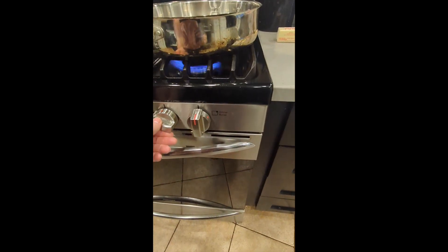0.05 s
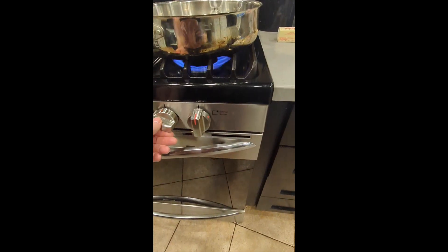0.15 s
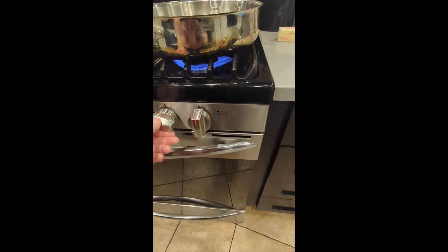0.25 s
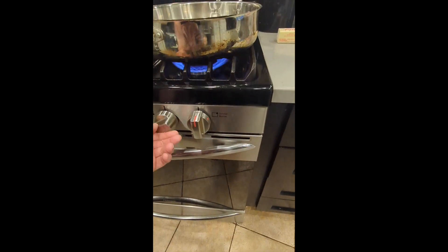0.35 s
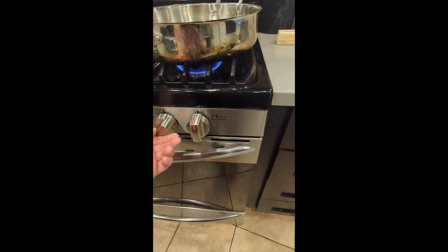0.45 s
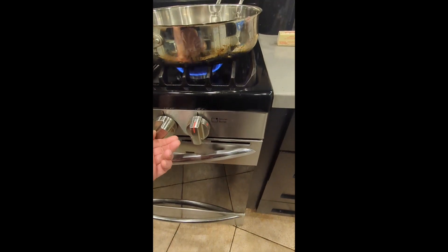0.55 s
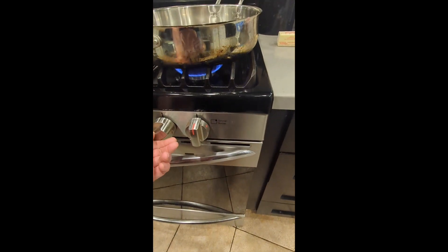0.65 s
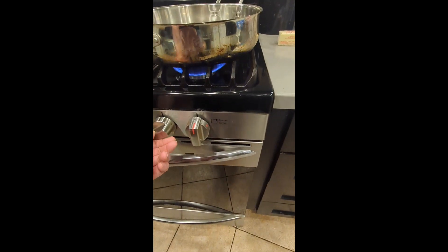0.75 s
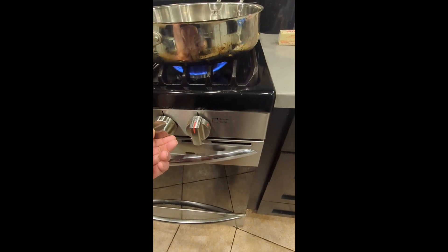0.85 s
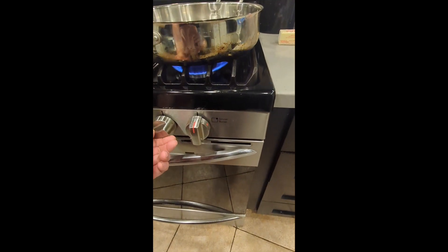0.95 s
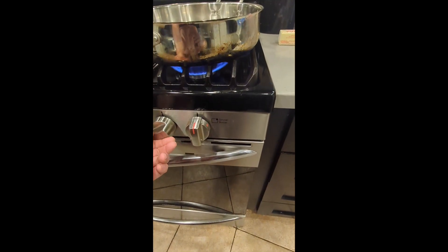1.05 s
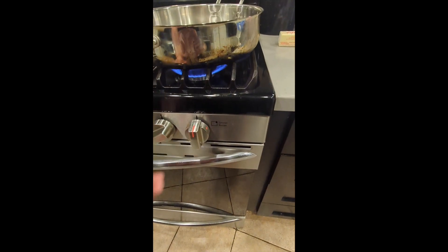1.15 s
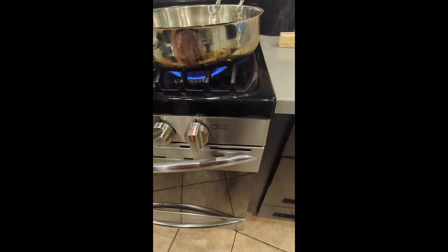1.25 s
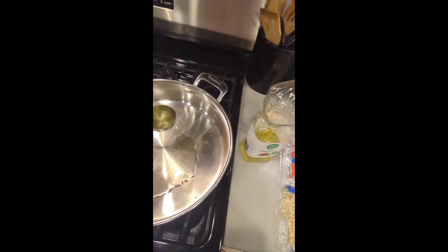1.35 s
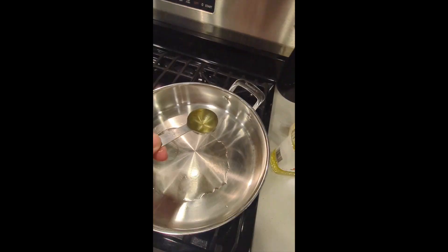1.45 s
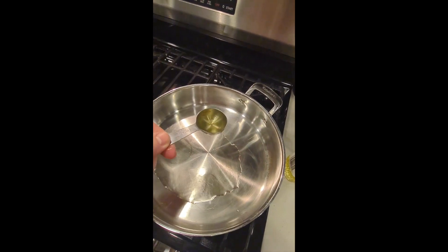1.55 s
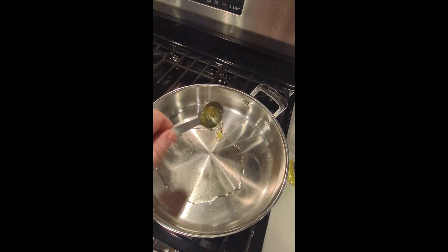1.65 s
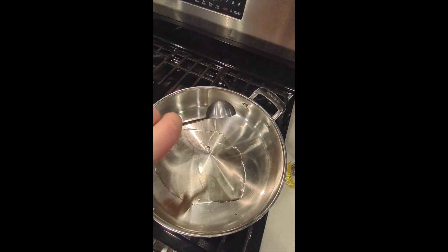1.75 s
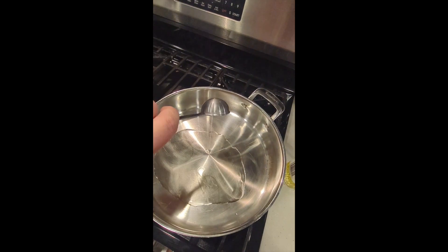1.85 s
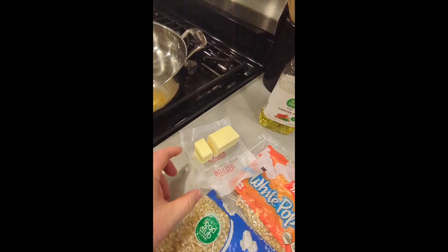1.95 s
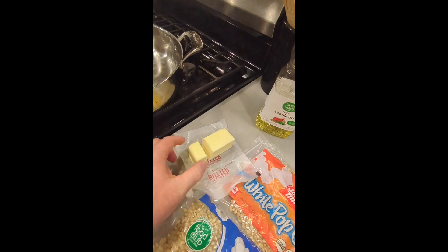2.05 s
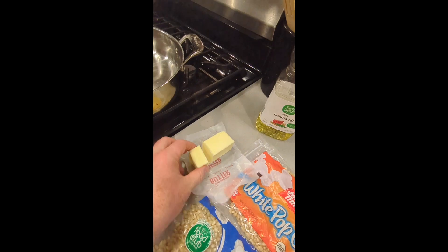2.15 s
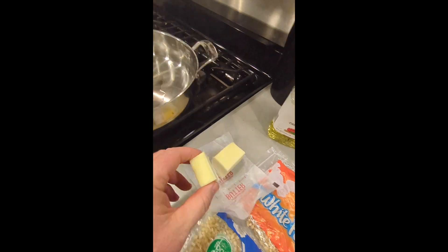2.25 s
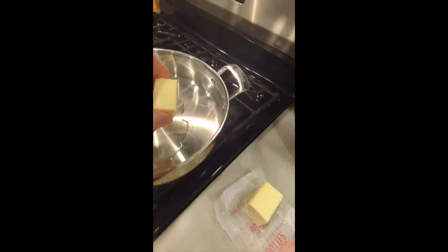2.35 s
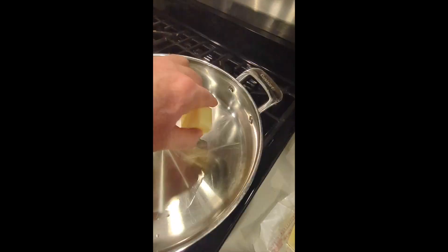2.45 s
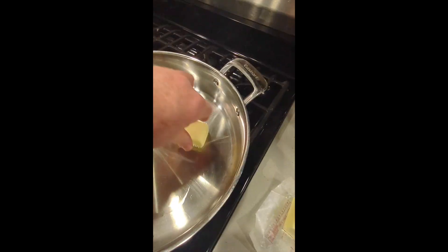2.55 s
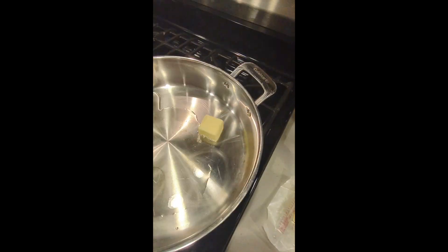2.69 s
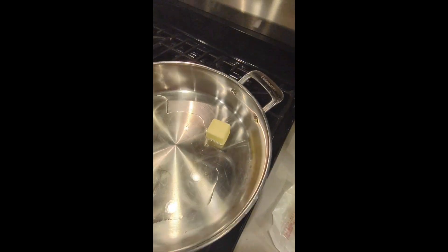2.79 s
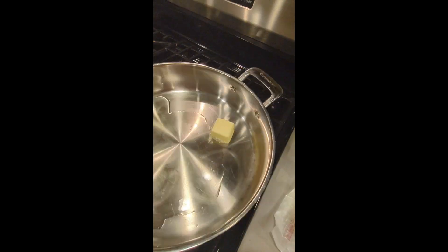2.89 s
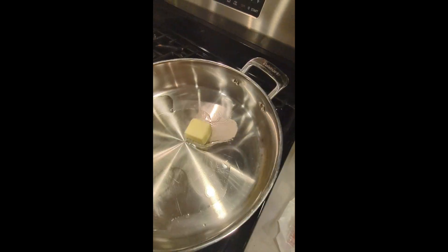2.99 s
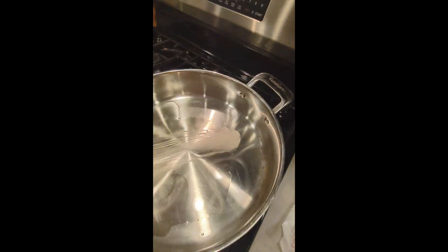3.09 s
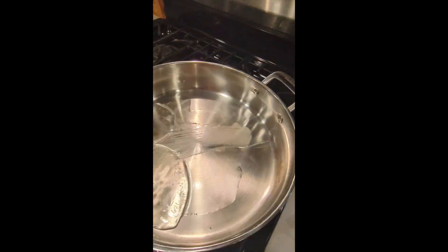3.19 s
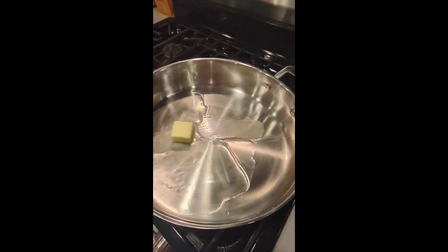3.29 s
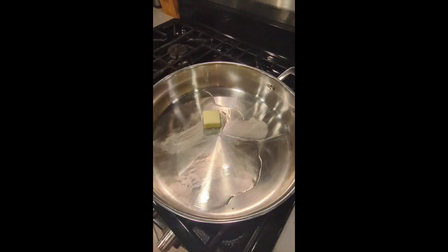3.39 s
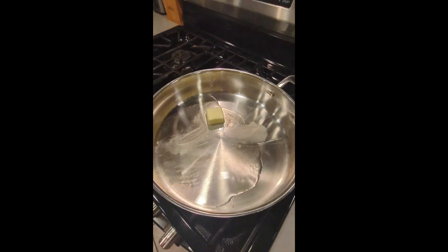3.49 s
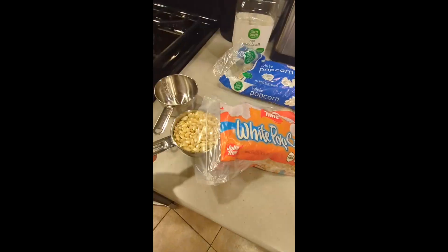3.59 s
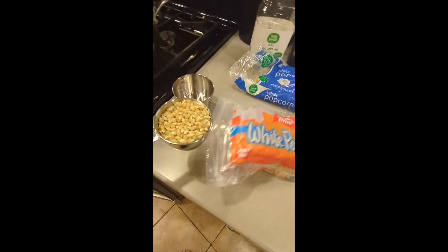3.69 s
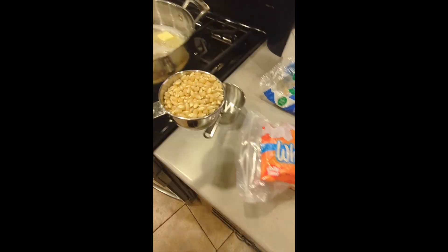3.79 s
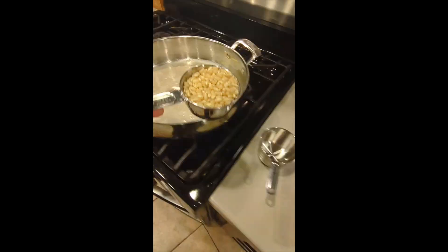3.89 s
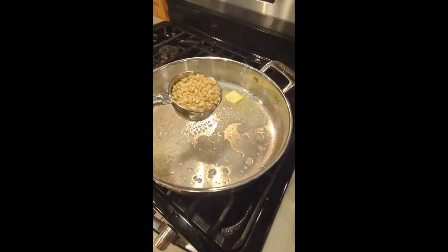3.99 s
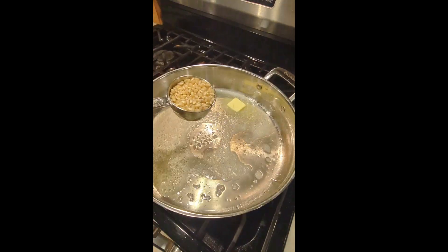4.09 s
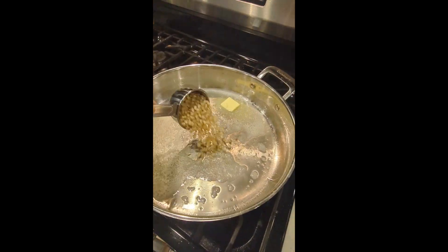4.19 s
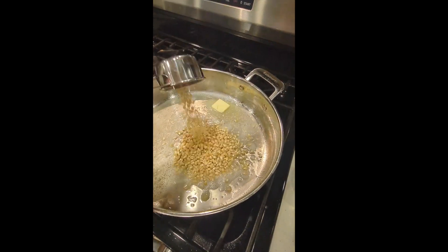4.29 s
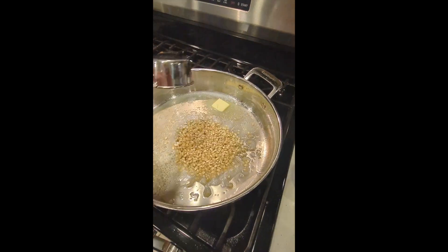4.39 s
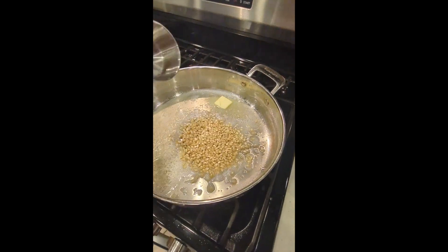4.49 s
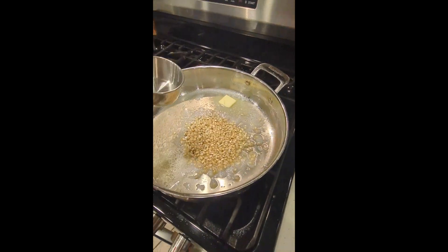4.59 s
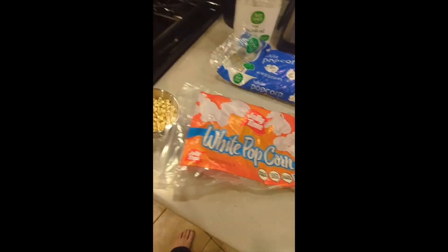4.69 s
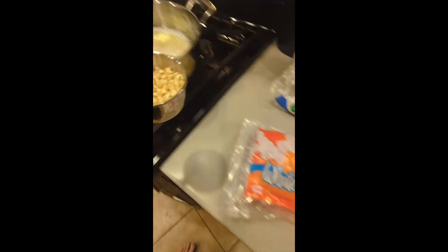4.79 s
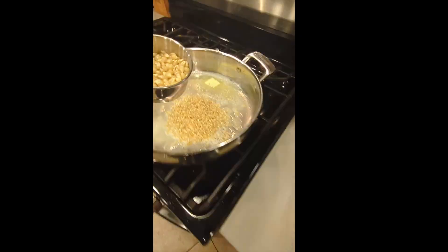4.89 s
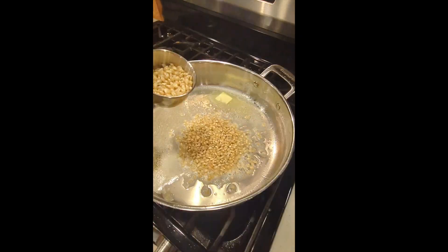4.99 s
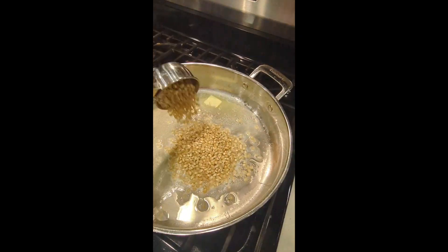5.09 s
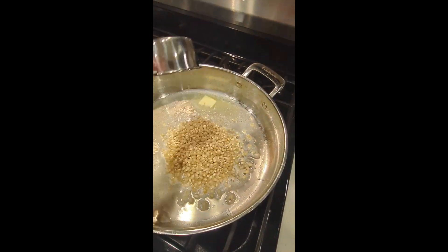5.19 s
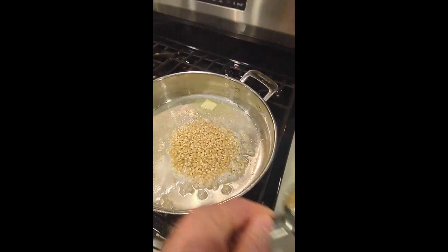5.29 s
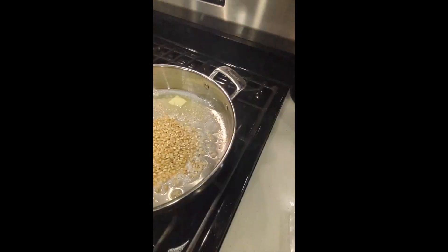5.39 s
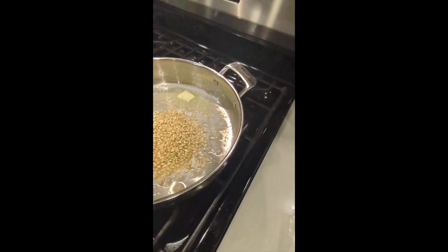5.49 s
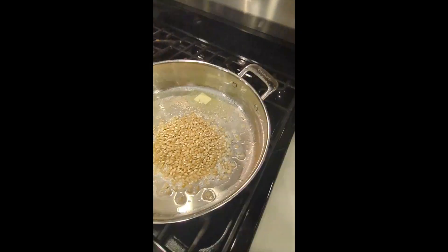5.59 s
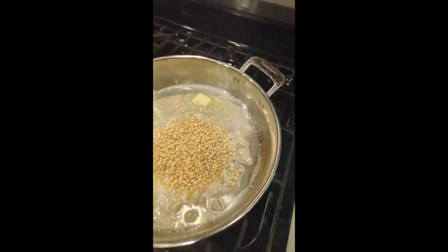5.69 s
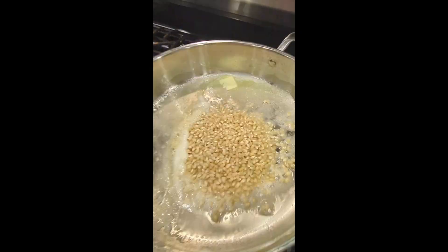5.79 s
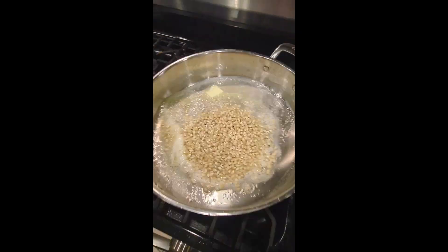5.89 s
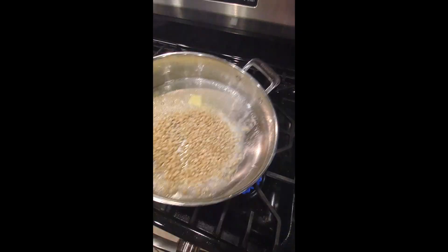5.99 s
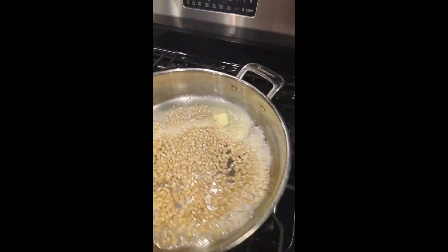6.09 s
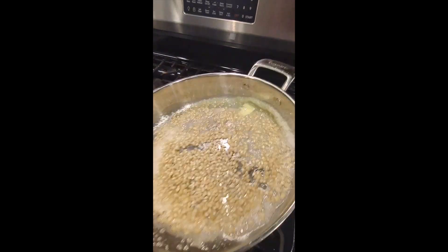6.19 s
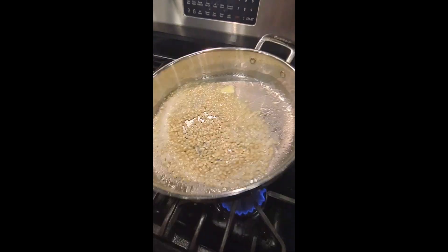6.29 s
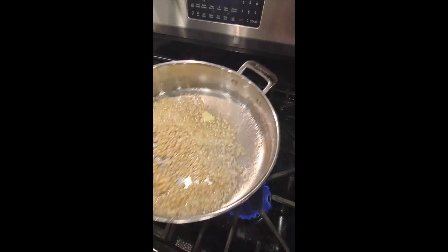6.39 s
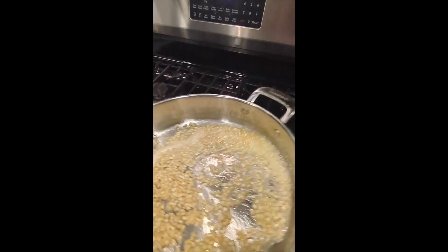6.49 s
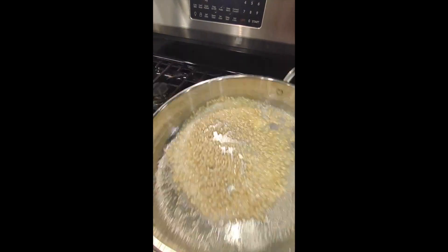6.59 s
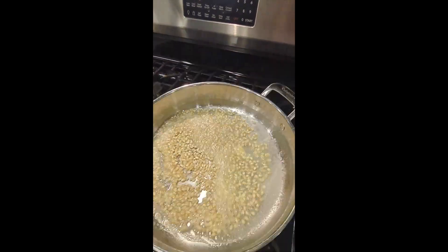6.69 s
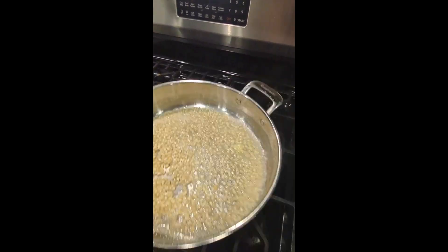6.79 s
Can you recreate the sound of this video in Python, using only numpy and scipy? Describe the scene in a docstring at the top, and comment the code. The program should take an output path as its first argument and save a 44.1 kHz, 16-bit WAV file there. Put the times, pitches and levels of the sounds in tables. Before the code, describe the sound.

Three sharp stove sparks, a soft gas whoosh, paper snaps, metallic pan knocks, two pours of hard kernels, then growing sizzle with swishing shakes.

```python
"""A steel pan is knocked, scraped and shaken on a gas stove while popcorn is started in hot fat.
Blows ring the pan's modes, kernels pour in as a hail of clicks, and the fat sizzles in tiny ringing bursts.
Igniter sparks are noisy cracks and the flame is coloured noise; a utensil, a cup and wrappers tap, clink and snap.
Appliance hum, a whine and air noise lie behind. Five short parts, each heard from a new place,
are joined by brief fades."""
import sys
import numpy as np
from scipy import signal
from scipy.fft import rfft, irfft, next_fast_len
from scipy.io import wavfile

SR = 44100
rng = np.random.default_rng(int(sys.argv[2]) if len(sys.argv) > 2 else 0)


def inscribe(sig):
    """Save sig as 16-bit PCM at rate SR to the path in sys.argv[1].

    A 1-D sig is mono; a 2-D sig holds one channel per row.
    Samples are clipped to [-1, 1] before scaling.
    """
    pcm = np.round(np.clip(np.atleast_2d(sig).T, -1, 1) * 32767)
    wavfile.write(sys.argv[1], SR, pcm.astype(np.int16))


N = 302085
T = np.arange(N) / SR

# pan modes: (pitch [Hz], 60 dB ring time when loaded [s], level when empty [dB], level when loaded [dB])
PAN_MODES = [(387, 0.12, -12, -16), (730, 0.088, -10, -16.5), (1270, 0.36, -35, -15.5),
             (1354, 0.21, -26, -15), (1567, 0.31, -18.5, -21), (1778, 0.6, -26.5, -13),
             (2341, 0.34, -15.5, -6.5), (2680, 0.5, -21, -31), (3700, 0.57, -31, -31),
             (3770, 0.38, -17, -45), (3980, 0.26, -12, -44), (5450, 0.19, -11, -37), (6745, 0.065, -18, -2)]
# kernels pouring: (first landing [s], fullest flow [s], level [dB], half length [s], pitch factor [ratio])
POUR_EVENTS = [(4.212, 4.265, -32, 0.069, 1), (5.084, 5.169, -36.5, 0.031, 1.06)]
# parts, each with the microphone in a new place: (start [s], kitchen level [dB], extra hum [dB])
PARTS = [(0, -63, -1), (1.358, -58, -4), (1.993, -56, -4), (3.559, -55.5, -3), (4.659, -55.5, -3)]
# how alike left and right are: (frequency [Hz], correlation [-1 to 1])
STEREO_LIKENESS = [(100, 0.98), (500, 0.85), (1200, 0.61), (2500, 0.46), (6000, 0.015)]
SOFT_CONTACT_HZ = 3230   # a dull blow barely reaches the modes above this


def pan():
    """The pan scrapes and lands on the iron grate; once the kernels are in, they damp its wall and upper modes."""
    # iron grate rocking under the pan: (time [s], level [dB])
    rock_events = [(6.015, -42), (6.02, -42)]
    # grate modes: (pitch [Hz], 60 dB ring time [s], level [dB])
    iron_modes = [(838, 0.05, 9.5), (1281, 0.21, -0.5), (2300, 0.47, -3), (2420, 0.31, 1)]
    # colour of the rocking and scraping: (frequency [Hz], relative level [dB per Hz])
    grate_colour = [(120, -16), (300, 3), (750, 9.5), (2400, -1), (6500, 4), (12000, -8)]
    # pan landing and settling: (time [s], level [dB], tilt [dB per octave], ring [dB])
    knock_events = [(3.157, -30.5, -2, -2), (3.1632, -16.5, 4.5, 2), (3.171, -24, 3.5, 2),
                    (3.177, -15, 0.5, -3), (3.185, -24.5, -0.5, 3.5), (3.346, -41.5, -5.5, 0),
                    (3.37, -38, -6, -2), (5.752, -23.5, 4, 0.5), (5.761, -33, -2, 8)]
    # colour of the knocks: (frequency [Hz], relative level [dB per Hz])
    knock_colour = [(130, -1), (300, 0.5), (1000, 1.5), (2400, 1.5), (4600, -2), (7500, 4), (9000, -5),
                    (16000, -15.5)]

    rocking = strikes(rock_events, grate_colour, iron_modes, crack_t60=0.066, tail_db=-7.5, tail_t60=0.45)
    out = scrape(grate_colour) + rocking
    first_pour_s = POUR_EVENTS[0][0]
    for loaded in (False, True):
        knocks = [row for row in knock_events if (row[0] > first_pour_s) == loaded]
        if loaded:
            modes = [(hz, t60, full_db) for hz, t60, empty_db, full_db in PAN_MODES]
        else:
            # the empty pan lands flat and hard, so the grate shortens its ring
            modes = [(hz, .65 * t60, empty_db) for hz, t60, empty_db, full_db in PAN_MODES]
            modes = modes + wall_modes()
        out = out + strikes(knocks, knock_colour, modes,
                            crack_t60=0.032, tail_db=-10.0, tail_t60=0.14, partials=400)
    return out


def wall_modes(count=44):
    """The pan's wall has a crowd of weak, closely spaced modes."""
    low_hz, high_hz, t60_s, level_db = 416.4, 4410, 0.24, -28.5
    pitches = np.linspace(low_hz, high_hz, count) + low_hz * rng.uniform(0, 0.45, count)
    return [(hz, t60_s, level_db) for hz in pitches]


def scrape(spectrum, width_hz=70, ring_db=22):
    """Steel judders over iron in tiny slips, which set the pan's lower modes singing."""
    # pan sliding, gathering speed until it catches: (catch [s], level [dB], run-up [s])
    slide_events = [(2.93, -48, 0.073), (5.702, -36, 0.019), (5.747, -37.5, 0.021), (6.78, -51, 0.19)]
    stop_s = 0.021
    speed = sum(from_db(db) * envelope(s, run_up, 0, stop_s) for s, db, run_up in slide_events)
    slips = grains(per_s=1800, spread_db=0.0)
    low_modes = [(hz, width_hz, full_db + ring_db)
                 for hz, t60, empty_db, full_db in PAN_MODES if hz < SOFT_CONTACT_HZ]
    singing = resonances(slips + 1e-18, low_modes)
    return speed * colour(slips + singing, spectrum)


def kernels(count=22):
    """Hard little impacts ring pan floor and cup; each lands elsewhere and so favours other resonances."""
    # pan floor and cup under the hail: (frequency before pitch factor [Hz], width [Hz], level [dB])
    hail_resonances = [(6470, 66, 4.5), (7550, 200, -8.5), (13100, 170, 0), (14700, 320, -5)]
    # colour of the pour: (frequency [Hz], relative level [dB per Hz])
    kernel_colour = [(150, -18), (1300, -4.5), (4500, -1.5), (7000, 3.5)]
    first_landing_s = 0.0093   # time for the first kernels to fade in

    impacts = grains(per_s=1300, spread_db=1.8)

    def hail(table):
        """Give each resonance its own random strength at every impact."""
        return sum(resonances(impacts * rng.standard_normal(N) + 1e-18, [row]) for row in table)

    weak = hail([(hz * rng.uniform(0.9, 0.95), 90, -6) for hz in np.geomspace(1350, 15200, count)])
    direct = from_db(-17) * impacts
    out = 0
    for landing, fullest, db, length, pitch in POUR_EVENTS:
        ringing = hail([(hz * pitch, width, peak_db) for hz, width, peak_db in hail_resonances])
        # the stream swells and thins as the cup tips, and is heard once the first kernels land
        landed = np.clip((T - landing) / first_landing_s, 0, 1)
        flow = landed * swells([(fullest, db, length)])
        out = out + flow * colour(ringing + weak + direct, kernel_colour)
    return out


def sizzle():
    """Water bursts out of the fat in separate spits; shaking wets the kernels and spits merge into a hiss."""
    # stretches of frying: (start [s], end [s], level at the start [dB])
    frying_spans = [(3.547, 4.641, -57), (4.666, 6.9, -57.5)]
    # kernels swishing through the fat as the pan is shaken: (time [s], level [dB], half length [s])
    shake_events = [(6.247, -40.5, 0.02), (6.372, -43.5, 0.068), (6.54, -36.5, 0.023),
                    (6.679, -28.5, 0.023), (6.751, -37.5, 0.031), (6.827, -31.5, 0.014)]
    # colour of the spits: (frequency [Hz], relative level [dB per Hz])
    fat_colour = [(300, 6.5), (1200, -5.5), (3300, -6.5), (4500, -3), (16000, 5)]
    # colour of the swish: (frequency [Hz], relative level [dB per Hz])
    swish_colour = [(500, -34), (3200, -11), (7000, 5.5), (15000, 1.5)]
    heating_db_per_s = 6   # frying grows as the fat heats
    # a shake flares the sizzle: level relative to the swish, rise and settling time
    flare_db, flare_rise_s, flare_settle_s = -14, 0.045, 0.08

    heat = sum(from_db(db + heating_db_per_s * (T - start)) * (T >= start) * (T < end)
               for start, end, db in frying_spans)
    flares = sum(from_db(db + flare_db) * envelope(s, flare_rise_s, 0, flare_settle_s)
                 for s, db, length in shake_events)
    level = heat + flares
    separate = scattered(spits(per_s=380, spread_db=2.7), wet_db=-1, t60=.025)
    ticks = colour(separate, fat_colour)
    hiss = colour(spits(per_s=5000, spread_db=-1.5), fat_colour)
    # the louder the frying, the more of it is hiss; half the power at -46 dB
    merged = level ** 2 / (level ** 2 + from_db(-46) ** 2)
    frying = level * (np.sqrt(1 - merged) * ticks + np.sqrt(merged) * hiss)
    swish = swells(shake_events) * colour(grains(per_s=4000, spread_db=-2.0), swish_colour)
    return frying + swish


def spits(per_s, spread_db, width_share=0.7, count=10):
    """Tiny bursts, each ringing briefly at one of several pitches."""
    bursts, dealt = grains(per_s, spread_db), rng.integers(0, count, N)
    out = 0
    for k, hz in enumerate(np.geomspace(2000, 15000, count)):
        out = out + resonate(bursts * (dealt == k) + 1e-18, hz, width_share * hz) / np.sqrt(hz)
    return rms_one(out)


def handling():
    """Utensil, cup, wrappers and hands: hard things ring, dull bumps and paper only crack and rustle."""
    # utensil tapping the pan, the last row a light knock on the grate: (time [s], level [dB], tilt [dB per
    # octave], ring [dB])
    tap_events = [(2.5985, -19.5, 1, 4), (2.912, -46, -5, -4), (2.933, -38, -9.5, 3),
                  (3.139, -45.5, -2.5, 8), (3.4255, -33, -4, -0.5)]
    # utensil modes: (pitch [Hz], 60 dB ring time [s], level [dB])
    utensil_modes = [(1380, 0.13, -19.5), (3270, 0.095, -8), (3440, 0.34, -30), (5350, 0.024, 4),
                     (5460, 0.092, -4.5), (6520, 0.055, -4.5), (7550, 0.049, -1.5), (10770, 0.037, -4)]
    # colour of the taps: (frequency [Hz], relative level [dB per Hz])
    tap_colour = [(150, -31), (700, -3), (3300, 2), (4400, 0), (5400, 6), (8500, -2.5), (12000, -13)]
    # measuring cup clinking: (time [s], level [dB], pitch [Hz])
    clink_events = [(4.215, -44, 6400), (4.273, -46, 7550), (5.11, -56, 7430), (5.12, -53, 7600),
                    (5.4545, -30, 7400), (5.468, -31.5, 7350)]
    # cup modes: (multiple of the clink's pitch [ratio], 60 dB ring time [s], level [dB])
    cup_modes = [(1.003, 0.033, 20), (1.017, 0.063, 11.5), (1.627, 0.055, 3)]
    # wrappers, stray kernels and loud spits of fat: (time [s], level [dB], tilt [dB per octave])
    snap_events = [(2.191, -43.5, 10), (3.635, -35.5, -3), (4.4545, -35, 5.5), (5.0165, -39.5, -2),
                   (5.0372, -37, 9), (5.372, -35, 0.5), (5.608, -37, 1.5)]
    # colour of snaps, clinks and rustles: (frequency [Hz], relative level [dB per Hz])
    snap_colour = [(120, -9), (700, -2), (2500, 3), (7000, 4), (16000, -6.5)]
    # butter peeling off its paper, a quick run of snaps: (time [s], level [dB], tilt [dB per octave])
    peel_events = [(2.2178, -31.5, 18.5), (2.226, -31, 14), (2.2328, -25, -3), (2.2382, -31, -4)]
    # colour of the peeling: (frequency [Hz], relative level [dB per Hz])
    paper_colour = [(200, -8), (1500, 3), (2100, -3), (2800, 9), (3900, -3.5), (5200, -1.5), (16000, -35)]
    # dull bumps of knob and hands: (time [s], level [dB], tilt [dB per octave])
    bump_events = [(.327, -47, 5), (5.364, -39, -14)]
    # colour of the bumps: (frequency [Hz], relative level [dB per Hz])
    bump_colour = [(60, -21), (330, -5), (1600, -22), (9000, -69)]
    # plastic and paper rustling: (time [s], level [dB], half length [s])
    rustle_events = [(2.03, -55, 0.0085), (3.728, -44, 0.011), (5.403, -45, 0.018)]

    taps = strikes(tap_events, tap_colour, utensil_modes,
                   crack_t60=0.04, tail_db=-5.0, tail_t60=0.11, partials=100)
    clinks = 0
    for s, db, pitch in clink_events:
        modes = [(pitch * k, t60, mode_db) for k, t60, mode_db in cup_modes]
        clinks = clinks + strikes([(s, db)], snap_colour, modes,
                                  crack_t60=0.042, tail_db=-12.0, tail_t60=0.21)
    snaps = strikes(snap_events, snap_colour, [], crack_t60=0.011, tail_db=-6.5, tail_t60=0.072)
    peeling = strikes(peel_events, paper_colour, [], crack_t60=0.013, tail_db=-12.5, tail_t60=0.064)
    bumps = strikes(bump_events, bump_colour, [], crack_t60=0.095, tail_db=-17.0, tail_t60=0.057)
    crumple = swells(rustle_events) * colour(grains(per_s=1200, spread_db=0.5), snap_colour)
    # taps lean to the left; clinks, snaps and peeling to the right
    left = taps * from_db([[1], [-1]])
    right = (clinks + snaps + peeling) * from_db([[-2], [2]])
    return left + right + bumps + crumple


def stove():
    """Sparks snap ten times a second, the gas catches with a puff and burns on under the pan."""
    # igniter sparks: (time [s], level [dB])
    spark_events = [(.0322, -11.5), (.1324, -13.5), (.2324, -12.5)]
    # colour of the sparks: (frequency [Hz], relative level [dB per Hz])
    spark_colour = [(150, -12), (1800, -15.5), (4200, -8), (13000, -1.5), (16000, -4)]
    # colour of the flame: (frequency [Hz], relative level [dB per Hz])
    flame_colour = [(40, -75), (100, -10.5), (250, -5), (700, -18), (1700, -29), (4600, -30),
                    (16000, -41.5)]
    # gap between burner and pan: (frequency [Hz], width [Hz], level relative to the steady flame [dB])
    burner_gap = (1190, 150, -11)
    ignition_s, attack_s, hold_s, release_s = 0.065, 0.033, 0.079, 0.0042
    puff_db, flame_db = -45.5, -54

    sparks = strikes(spark_events, spark_colour, [],
                     crack_t60=0.0088, tail_db=-8.5, tail_t60=0.05, partials=950)
    sparks = scattered(sparks, wet_db=-15.5, t60=0.24)
    puff = envelope(ignition_s, attack_s, hold_s, release_s)
    # the flame is heard in the first part only
    burning = np.minimum(T / ignition_s, 1) * (part_number() == 0)
    level = from_db(puff_db) * puff + from_db(flame_db) * burning
    hz, width, db = burner_gap
    # two passes, each twice as wide
    once = resonate(noise(flame_colour), hz, 2 * width)
    gap = from_db(db) * rms_one(resonate(once, hz, 2 * width))
    # the gap sings hardest while the gas is catching
    roar = noise(flame_colour) + gap * (1 + puff)
    return sparks + level * roar * from_db([[-1], [1]])


def kitchen():
    """Appliance hum, changing with the microphone's place, over a whining motor and moving air."""
    # hum in front of the stove: (multiple of hum_hz [ratio], level relative to the air [dB])
    front_hum = [(1, 5), (2, 9)]
    # hum above the hob: (multiple of hum_hz [ratio], settled level relative to the air [dB],
    # extra level as a part opens [dB])
    above_hum = [(2, -3, -4.5), (4, -3.5, 6.5)]
    # faint steady motor tone: (pitch [Hz], level relative to the air [dB])
    motor_tone = [(1782, -16)]
    # colour of the air: (frequency [Hz], relative level [dB per Hz])
    air_colour = [(30, -22), (125, -45.5), (200, -0.5), (400, -4), (1200, -6.5), (2500, -19.5),
                  (9500, -22.5), (16000, -28)]
    # resonances of the pan, ringing faintly along with the air noise: (frequency [Hz], width [Hz], level [dB])
    sympathetic_pan_resonances = [(2320, 240, 3.5)]
    hum_hz, hum_settle_s = 239.9, 0.24

    place = part_number()
    start, level_db, hum_db = np.transpose(PARTS)
    # the upper hum line is loudest as a part opens, the lower one weakest; then both settle
    fresh = np.exp(-(T - start[place]) / hum_settle_s)
    above = sum(tones([(k, db)], hum_hz) * from_db(extra_db * fresh) for k, db, extra_db in above_hum)
    hum = from_db(hum_db)[place] * np.where(place == 0, tones(front_hum, hum_hz), above)
    air = noise(air_colour)
    air = rms_one(air + resonances(air, sympathetic_pan_resonances))
    # the whine is heard only above the hob
    return from_db(level_db)[place] * (air + hum + (place > 0) * tones(motor_tone))


def strikes(events, spectrum, modes, crack_t60, tail_db, tail_t60, partials=300, vary_db=1, low_cut_hz=200):
    """Each blow is a noisy crack, a tail of many weak partials and the strong modes of the object."""
    detune = 0.0035   # largest share by which a contact shifts a mode, so that overlapping blows beat
    t = np.arange(SR // 2) / SR
    out = np.zeros((2, N + len(t)))

    def fade(t60):
        """Fall by 60 dB in t60 seconds."""
        return np.exp(-np.log(1000) * t / t60)

    bins = len(t) // 2 + 1
    is_partial = rng.random(bins) < partials / bins   # the same for every blow in this call
    for s, level_db, *manner in events:
        tilt_db, ring_db = manner + [0] * (2 - len(manner))   # a plain blow unless the row says more
        crack = colour(rng.standard_normal((2, len(t))), spectrum, tilt_db)
        partial_waves = irfft(is_partial * np.exp(2j * np.pi * rng.random((2, bins))), len(t))
        tail = colour(partial_waves, spectrum, tilt_db)
        blow = crack * fade(crack_t60) + from_db(tail_db) * tail * fade(tail_t60)
        for hz, t60, mode_db in modes:
            # short waves reach the two microphones out of step
            alike = np.clip(at_hz(STEREO_LIKENESS, hz), -1, 1)
            apart = np.arccos(alike) * rng.choice([-.5, .5])
            phase = rng.uniform(0, 2 * np.pi) + apart * np.array([[1], [-1]])
            soft_db = min(tilt_db, 0) * max(np.log2(hz / SOFT_CONTACT_HZ), 0)
            strength = from_db(mode_db + ring_db + soft_db + vary_db * rng.standard_normal((2, 1)))
            shifted_hz = hz * (1 + detune * rng.uniform(-0.92, 1))
            blow += strength * np.sin(2 * np.pi * shifted_hz * t + phase) * fade(t60)
        start = round(s * SR)
        out[:, start:start + len(t)] += from_db(level_db) * blow
    # small objects radiate little bass
    high_pass = signal.butter(4, low_cut_hz, "high", fs=SR, output="sos")
    return signal.sosfilt(high_pass, out[:, :N] + 1e-18)


def scattered(x, wet_db, t60):
    """Nearby steel and tiles add a short spray of reflections to every click."""
    t = np.arange(SR // 8) / SR
    spray = rng.standard_normal((2, len(t))) * np.exp(-np.log(1000) * t / t60)
    spray /= np.sqrt(np.sum(spray ** 2, axis=1, keepdims=True))
    return x + from_db(wet_db) * signal.fftconvolve(x, spray, axes=1)[:, :N]


def colour(pair, spectrum, tilt_db=0):
    """Two unrelated signals become a stereo sound of this spectrum, alike in the bass; rms 1."""
    size = pair.shape[1]
    padded = next_fast_len(size)
    hz = np.maximum(np.fft.rfftfreq(padded, 1 / SR), 1)
    alike = np.clip(at_hz(STEREO_LIKENESS, hz), -1, 1)
    # the tilt starts at the second point of the spectrum
    octaves = np.log2(np.maximum(hz, spectrum[1][0]))
    mid, side = rfft(pair, padded) * from_db(at_hz(spectrum, hz) + tilt_db * octaves)
    stereo = np.sqrt(1 + alike) * mid + np.sqrt(1 - alike) * side * [[1], [-1]]
    return rms_one(irfft(stereo, padded)[:, :size])


def noise(spectrum):
    """Smooth stereo noise of this spectrum."""
    return colour(rng.standard_normal((2, N)), spectrum)


def grains(per_s, spread_db):
    """Random clicks of either sign and uneven size, scaled to unit power."""
    sizes = from_db(spread_db * np.minimum(rng.exponential(1, (2, N)), 5))
    happens = rng.random((2, N)) < per_s / SR
    return rms_one(happens * sizes * rng.choice([-1, 1], (2, N)))


def resonate(x, hz, width):
    """A resonance with gain about 1 on top."""
    r = np.exp(-np.pi * width / SR)
    feed = np.array([1, 0, -1]) * (1 - r * r) / 2
    return signal.lfilter(feed, [1, -2 * r * np.cos(2 * np.pi * hz / SR), r * r], x)


def resonances(x, table):
    """Several resonances side by side."""
    return sum(from_db(db) * resonate(x, hz, width) for hz, width, db in table)


def tones(rows, unit_hz=1):
    """Steady sines of the given rms levels."""
    return np.sqrt(2) * sum(from_db(db) * np.sin(2 * np.pi * (k * unit_hz * T + rng.random()))
                            for k, db in rows)


def swells(rows):
    """A smooth rise and fall of gain for each row."""
    return sum(from_db(db) * np.exp(-.5 * ((T - s) / length) ** 2) for s, db, length in rows)


def envelope(s, attack_s, hold_s, release_s):
    """Exponential rise up to time s, a hold at 1, exponential release."""
    return np.exp(np.minimum(T - s, 0) / attack_s - np.maximum(T - s - hold_s, 0) / release_s)


def part_number():
    """Number of the part at every moment; the first is in front of the stove, the others above the hob."""
    return np.searchsorted([s for s, *levels in PARTS[1:]], T)


def at_hz(points, hz):
    """Read a table on a log-frequency axis."""
    f, value = np.transpose(points)
    return np.interp(np.log(hz), np.log(f), value)


def from_db(db):
    """Decibels to gain."""
    return 10 ** (np.asarray(db) / 20)


def rms_one(x):
    """Scale to unit power."""
    return x / np.sqrt(np.mean(x ** 2) + 1e-20)


def scene():
    """Everything around the stove."""
    return pan() + kernels() + sizzle() + handling() + stove() + kitchen()


def record(dry, fade_out_s=0.0052, fade_in_s=0.012, gap_s=0.0037):
    """The sound fades down and up again at each join; the top of the treble is cut."""
    cutoff_hz = 16200
    joins = [np.maximum((s - gap_s - T) / fade_out_s, (T - s - gap_s) / fade_in_s)
             for s, *levels in PARTS[1:]]
    opening = np.min(joins, axis=0)
    faded = dry * np.clip(opening, .07, 1)   # never quite silent
    low_pass = signal.ellip(10, .2, 80, cutoff_hz, fs=SR, output="sos")
    return signal.sosfilt(low_pass, faded)


dry = scene()
out = record(dry)
inscribe(out)
```